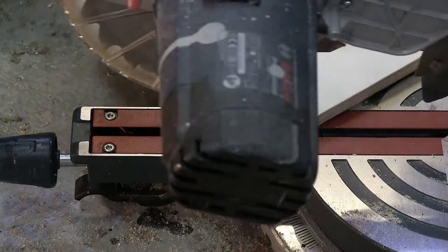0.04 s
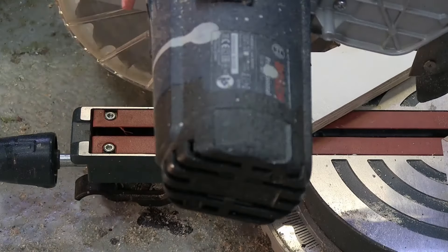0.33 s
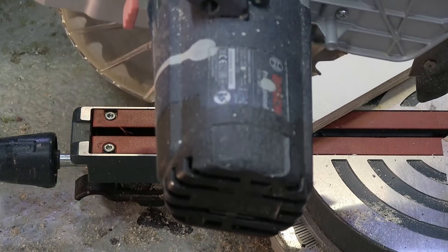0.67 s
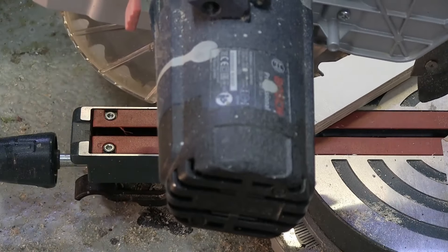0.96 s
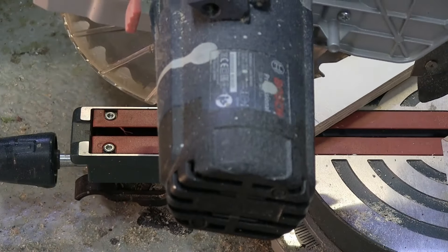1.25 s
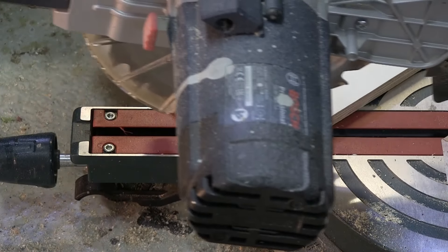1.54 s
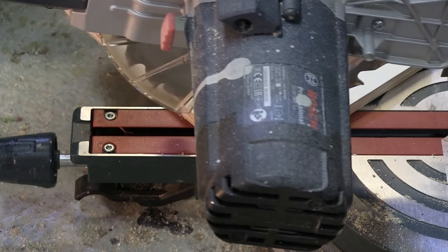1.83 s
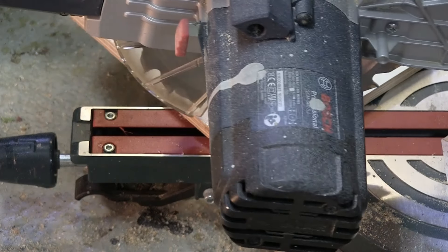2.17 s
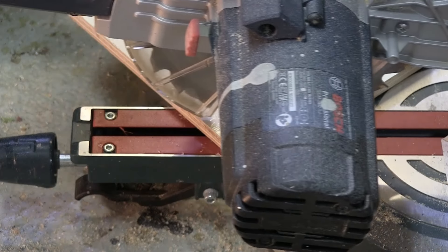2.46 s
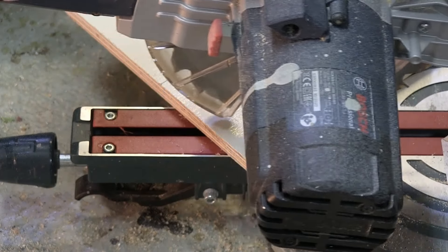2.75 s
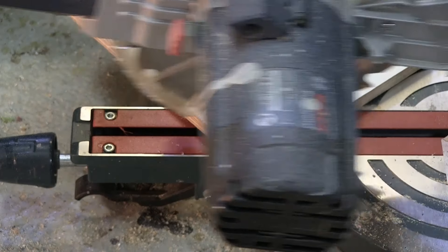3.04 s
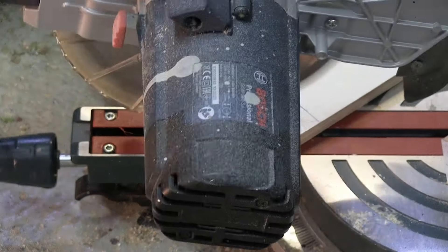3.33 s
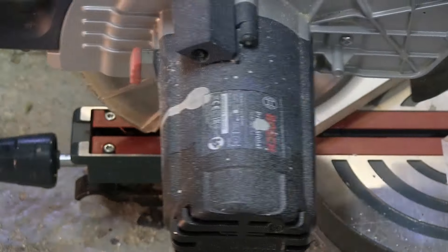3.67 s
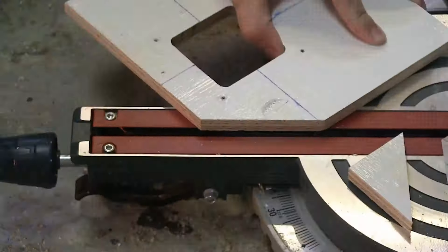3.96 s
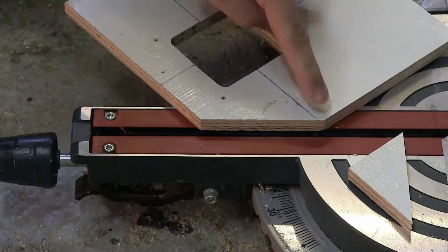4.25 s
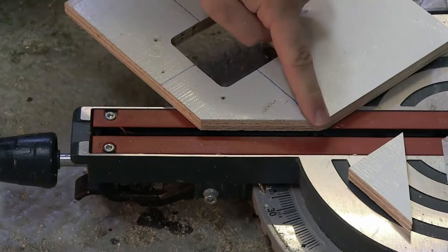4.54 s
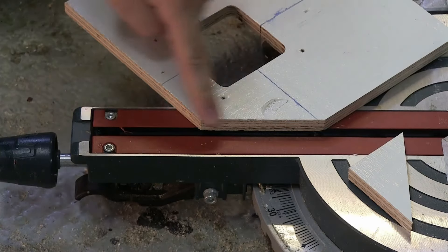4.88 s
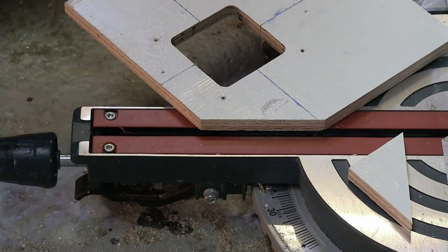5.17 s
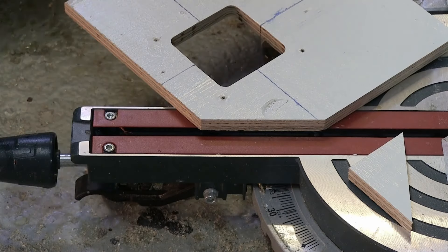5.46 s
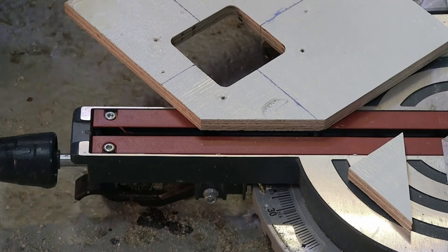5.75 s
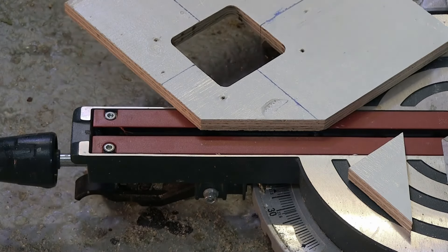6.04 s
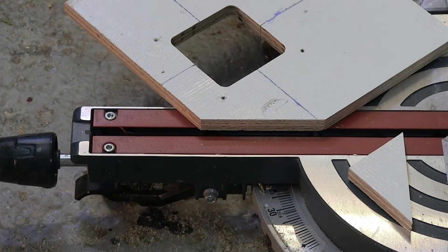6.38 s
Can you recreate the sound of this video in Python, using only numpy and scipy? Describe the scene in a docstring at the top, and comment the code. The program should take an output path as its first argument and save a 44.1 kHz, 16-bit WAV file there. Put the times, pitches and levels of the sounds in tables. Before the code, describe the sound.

A miter saw slides with light knocks, then roars through plywood and winds down with a falling whine and rattle.

```python
"""A quiet workshop, microphone close to a sliding miter saw, a fast limiter on the peaks.
The head is lined up: knocks ring its frame, the guard linkage clacks, and it rolls along its rails.
The motor jolts on with a roar of fan air and a gear whine; the blade screams and tears through plywood.
A brake pulls the whine down, then the blade coasts and rings while loose gears rattle in their
housing and the brushes sizzle on the commutator."""
import sys
import numpy as np
from scipy import signal
from scipy.fft import rfft, irfft, next_fast_len
from scipy.io import wavfile
from scipy.ndimage import uniform_filter1d, minimum_filter1d, map_coordinates

SR = 44100
rng = np.random.default_rng(int(sys.argv[2]) if len(sys.argv) > 2 else 0)


def file_out(sig):
    """Save sig as 16-bit WAV at sys.argv[1]."""
    # one column per channel
    cols = np.atleast_2d(sig).T
    # limit, then scale
    lim = np.clip(cols, -1, 1)
    pcm = np.round(lim * 32767).astype(np.int16)
    wavfile.write(sys.argv[1], SR, pcm)


N = 282548

# knocks of the saw head and the board (time [s], relative level [dB], click [dB], most excited [Hz])
HEAD_KNOCKS = [(0.019, -35, -24, 415), (0.184, -39, -15, 396), (0.856, -29.5, -21, 460),
               (0.876, -25.5, -24, 390), (0.891, -24.5, -15, 404), (0.907, -27.5, -19, 388),
               (0.927, -21.5, -17, 610), (0.939, -25.5, -24, 630), (1.13, -33, -17, 425)]
# spectrum of a hard contact (frequency [Hz], relative level [dB])
CONTACT_SPECTRUM = [(300, -33), (700, 8.5), (1500, 1), (3500, -2), (6000, -16), (15000, -42)]
# broad spectrum of the fan air and of the shaking that drives the blade (frequency [Hz], level [dB])
RUSH_SPECTRUM = [(150, -43), (400, -15.5), (900, -9), (1500, -5), (2100, -3), (3300, -1), (4800, -3),
                 (6400, -23), (9000, -46), (15000, -70)]
# spectrum of air and dust thrown off the blade (frequency [Hz], relative level [dB])
SPRAY_SPECTRUM = [(3240, -24), (5500, 1), (6500, -5), (6910, -3), (11400, -10.5), (15700, -14.5)]

TRIGGER, CUT_START, CUT_END = 3.298, 3.4, 3.85  # s; the brake grips as the cut ends
BRAKE_EASES, BRAKE_END = 4.16, 4.34  # s
TOP_SPEED = 366  # the rotor running free; all speeds are in turns per second
CRITICAL_SPEED, CRITICAL_OCTAVES = 34.7, 0.36  # gears, brushes and blade shake harder in this range


def amp(db):
    """Decibels to gain."""
    return 10 ** (np.asarray(db) / 20)


def unit(x):
    """Scale to rms 1."""
    return x / np.sqrt(np.mean(x ** 2) + 1e-20)


def clock():
    """The time of every sample in seconds."""
    return np.arange(N) / SR


def along(points, hz):
    """Read a curve of (Hz, value) points on a log frequency axis."""
    freqs, values = np.transpose(points)
    return np.interp(np.log(hz + 1), np.log(freqs + 1), values)


def wobble(rate):
    """A smooth random curve with rate knots a second."""
    return map_coordinates(rng.standard_normal(int(N * rate / SR) + 4), [clock() * rate])


def swell(start, end, rise, t60):
    """An envelope: a smooth rise from start, held until end, then dying away."""
    t = clock()
    attack = np.sin(np.pi / 2 * np.clip((t - start) / rise, 0, 1)) ** 2
    return attack * amp(-60 * np.maximum(t - end, 0) / t60)


def near(speed, best, octaves):
    """1 at the best speed, falling off to both sides."""
    return np.exp(-.5 * (np.log2(speed / best) / octaves) ** 2)


def powered(rise):
    """0 before the trigger is pulled, 1 from rise seconds after."""
    return np.clip((clock() - TRIGGER) / rise, 0, 1)


def filtered(x, response):
    """Filter x by a gain given as a function of frequency."""
    size = next_fast_len(N + SR // 2)
    return irfft(rfft(x, size) * response(np.fft.rfftfreq(size, 1 / SR)), size)[:N]


def coloured(x, spectrum):
    """x shaped by a spectrum, at rms 1."""
    return unit(filtered(x, lambda hz: amp(along(spectrum, hz))))


def noise(spectrum):
    """Noise of rms 1 with this spectrum."""
    return coloured(rng.standard_normal(N), spectrum)


def tone(hz, blur_hz, flutter_db):
    """A machine tone of rms 1, unsteady in pitch and level."""
    phase = 2 * np.pi * np.cumsum(hz + blur_hz * wobble(150)) / SR
    return unit(np.sin(phase) * amp(flutter_db * wobble(70)))


def impacts(rate, scatter_db, jitter=0.3):
    """A train of rate blows a second, uneven in time and size, at steady power."""
    passed = np.cumsum(rate) / SR
    late, size = rng.standard_normal((int(passed[-1]), 2)).T
    at = np.searchsorted(passed, np.arange(len(size)) + jitter * late).clip(0, N - 1)
    polarity = np.sign(rng.standard_normal(len(size)))
    blows = polarity * amp(scatter_db * size.clip(-2.5, 2.5)) / np.sqrt(rate[at])
    return unit(np.bincount(at, blows, N))


def resonate(x, modes, swell_db):
    """x rings a set of resonances, each swelling and fading in its own time; rms 1."""
    out = np.zeros(N)
    for centre, width, db in modes:
        ring = filtered(x, lambda f: 1j * f * width / (centre ** 2 - f * f + 1j * f * width))
        out += amp(db + swell_db * wobble(7)) * ring
    return unit(out)


def room_tone():
    """The workshop's faint, steady background."""
    # background spectrum (frequency [Hz], relative level [dB])
    background = [(15, -48), (25, -12), (70, -2), (152, -12), (291, -13.5), (391, -9), (618, -14.5),
                  (831, -19), (1970, -19), (13700, -24), (15700, -29.5)]
    return amp(-59.5) * noise(background)


def slide():
    """Pushes roll the head on its rails; pushes and knocks set its arm shuddering at a low resonance."""
    # pushes of the hand (start [s], end [s], rolling [dB], shudder [dB])
    pushes = [(-0.15, 0.056, -52, -47), (0.503, 0.637, -56, -70), (1.36, 1.68, -56.5, -47),
              (1.852, 2.034, -60, -46), (2.206, 2.513, -77, -52), (2.475, 2.703, -53.5, -46.5),
              (2.854, 3.185, -37.5, -45.5)]
    # spectrum of the shaking arm (frequency [Hz], relative level [dB])
    arm_spectrum = [(15, -28), (25, -13), (49, 4), (64, 4.5), (79, 1), (129, -9.5), (140, -23), (180, -15),
                    (310, -120)]
    # spectrum of the rolling on the rails (frequency [Hz], relative level [dB])
    rail_spectrum = [(65, -12), (110, -17.5), (184, 2.5), (217, -15.5), (348, 0.5), (558, -13), (700, -6.5),
                     (953, -14), (3940, -17.5), (7300, -34.5), (15000, -42)]
    roll = [amp(db) * swell(start, end, rise=0.2, t60=0.38) for start, end, db, _ in pushes]
    shake = [amp(db) * swell(start, end, rise=0.2, t60=1.38) for start, end, _, db in pushes]
    shake += [amp(db - 33.5) * swell(s, s + 0.053, rise=0.053, t60=1.38) for s, db, _, _ in HEAD_KNOCKS]
    shudder = unit(noise(arm_spectrum) + amp(-2) * tone(68, blur_hz=6, flutter_db=-1))
    rolling = np.linalg.norm(roll, axis=0) * noise(rail_spectrum) * amp(1.44 * wobble(70))
    return (1 - powered(0.01)) * (rolling + np.linalg.norm(shake, axis=0) * shudder)


def knocks():
    """Each knock rings the hollow frame under a click; where it lands decides which modes answer."""
    # modes of the frame (frequency [Hz], relative level [dB], t60 [s])
    frame_modes = [(398, 8.5, 0.051), (430, -13, 0.096), (620, 4, 0.046), (795, -3, 0.021),
                   (1410, 15, 0.024), (2200, 8, 0.28), (4240, 27, 0.018)]
    out, t = np.zeros(N + SR), np.arange(SR // 4) / SR
    contact = noise(CONTACT_SPECTRUM)
    attack = 1 - np.exp(-t / 0.00083)
    for start, db, click_db, centre_hz in HEAD_KNOCKS:
        at = round(start * SR)
        ring = np.zeros(len(t))
        for hz, level, t60 in frame_modes:
            struck_db = level - 17 * abs(np.log2(hz / centre_hz))
            ring += amp(struck_db - 60 * t / t60) * np.sin(2 * np.pi * hz * t)
        click = amp(click_db - 1 - 60 * t / 0.1) * contact[at:at + len(t)]
        out[at:at + len(t)] += amp(db - 4) * (ring / np.abs(ring).max() + click) * attack
    return out[:N]


def guard_clacks():
    """The guard linkage snaps: a crack, then a thin metal ring, cut short if the parts stay in contact."""
    # snaps of the linkage (time [s], level [dB], most excited [Hz], share of the full ring time [0-1])
    snaps = [(0.433, -45, 3000, .5), (0.466, -38, 900, 0.93), (2.192, -43, 700, 0.12),
             (2.366, -49, 5000, 0.3), (3.314, -15, 905, 0.5)]
    # modes of the linkage (frequency [Hz], relative level [dB], full t60 [s])
    linkage_modes = [(715, 1, 0.06), (750, -13, .4), (1110, -9.5, .12), (1540, -11, 0.055),
                     (2224, -10, .42), (3000, -9, .04), (4100, 3, 0.054), (4460, -3, .1)]
    out, t = np.zeros(N + SR), np.arange(SR // 2) / SR
    contact = noise(CONTACT_SPECTRUM)
    for start, db, centre_hz, share in snaps:
        at = round(start * SR)
        ring = np.zeros(len(t))
        for hz, level, t60 in linkage_modes:
            struck_db = level - 6.5 * abs(np.log2(hz / centre_hz))
            ring += amp(struck_db - 60 * t / (t60 * share)) * np.sin(2 * np.pi * hz * t)
        crack = amp(-9.5 - 60 * t / 0.044) * contact[at:at + len(t)]
        out[at:at + len(t)] += amp(db) * (ring / np.abs(ring).max() + crack)
    return out[:N]


def jolt():
    """The starting torque slams the gears together and shakes the whole arm."""
    # spectrum of the slam (frequency [Hz], relative level [dB])
    slam_spectrum = [(120, -57), (200, -32), (324, -9.5), (462, -24), (555, -6.5), (636, -25), (908, -2.5),
                     (1020, -12), (2000, -14), (2600, -20), (4400, -120)]
    age = np.maximum(clock() - TRIGGER, 0)
    return amp(-25) * np.exp(-(age / 0.1) ** 2) * noise(slam_spectrum)


def cut_depth():
    """The blade is fed steadily through the board, from 0 to 1."""
    return np.clip((clock() - CUT_START) / (CUT_END - CUT_START), 0, 1)


def rotor_speed():
    """Turns per second: the motor runs up, sags in the cut, is braked hard and then coasts."""
    run_up_s, brake_s, coast_s = 0.048, 0.49, 4.5  # time constants
    sag, coast_speed = 31, 91  # turns per second: lost in the cut, left when the brake lets go
    brake_drag, bearing_drag = 110, 25.6  # turns per second lost each second
    t = clock()
    driven = TOP_SPEED * (1 - np.exp(-np.maximum(t - TRIGGER, 0) / run_up_s)) - sag * cut_depth() ** 3.5
    drag = brake_drag * brake_s
    braked = (TOP_SPEED - sag + drag) * np.exp(-(t - CUT_END) / brake_s) - drag
    friction = bearing_drag * coast_s
    coasting = (coast_speed + friction) * np.exp(-(t - BRAKE_END) / coast_s) - friction
    return np.maximum(np.where(t < CUT_END, driven, np.maximum(braked, coasting)), 1)


def gear_play(speed):
    """How hard the teeth rattle: kicked by the start, pressed by the brake, then loose while coasting."""
    starting = amp(-19) * swell(TRIGGER, TRIGGER + 0.059, rise=0.014, t60=0.36)
    braking = amp(-29.5) * swell(CUT_END, BRAKE_EASES, rise=0.075, t60=0.94)
    loose = amp(-33.5 + 2.5 * near(speed, CRITICAL_SPEED, CRITICAL_OCTAVES))
    loose *= swell(BRAKE_END - 0.06, N / SR, rise=0.076, t60=1)
    loose *= np.minimum(speed / 26, 1) ** 0.65  # dies away towards rest
    return starting + np.hypot(braking, loose)


def gear_rattle(speed, teeth, loose_teeth):
    """Tooth blows ring the gear housing over a broad clatter."""
    # resonances of the housing (frequency [Hz], width [Hz], relative level [dB])
    housing_modes = [(780, 45, 4.5), (1044, 70, 1.5), (1252, 50, 2.5), (1400, 20, -8), (2630, 110, 8),
                     (3186, 79, 5), (3720, 90, 1), (4776, 120, 2)]
    # spectrum of the loose teeth (frequency [Hz], relative level [dB])
    clatter_spectrum = [(240, -80), (400, -16.5), (746, -3.5), (871, -8.5), (1070, 1.5), (1700, -6),
                        (2620, -3.5), (4850, -8.5), (5030, -17), (5300, -14), (7000, -34), (9100, -60),
                        (15400, -120)]
    ring = amp(-5.5) * resonate(teeth, housing_modes, swell_db=4)
    clatter = amp(-1.5) * coloured(loose_teeth, clatter_spectrum)
    return gear_play(speed) * (ring + clatter)


def fan_roar(speed):
    """Air rushes through the motor fan, louder with speed."""
    return amp(-20.5) * (speed / TOP_SPEED) ** 1.26 * noise(RUSH_SPECTRUM) * amp(1.2 * wobble(200))


def brush_sizzle(speed, glide):
    """Carbon brushes scrape the commutator bars and ring the blade, chattering at the critical speed."""
    # thin, high modes of the blade (frequency [Hz], width [Hz], relative level [dB])
    high_modes = [(7740, 52, -3), (8740, 45, 1), (11130, 54, 0), (13600, 95, -23)]
    # spectrum of the brushes (frequency [Hz], relative level [dB])
    hiss_spectrum = [(3240, -10), (5050, 1), (5400, 3.5), (6670, -1.5), (7850, 1.5), (8760, 0.5),
                     (10200, -7.5), (11500, 0.5), (12500, -1), (15700, -26)]
    scrape = impacts(24 * speed, scatter_db=2) + rng.standard_normal(N) + .45 * glide
    ring = amp(-11) * resonate(scrape, high_modes, swell_db=5.5)
    hiss = amp(-1) * coloured(scrape, hiss_spectrum)
    level = amp(-39.5) * np.minimum(speed / 133, 1) ** 0.98
    chatter = amp(5 * near(speed, CRITICAL_SPEED, CRITICAL_OCTAVES))
    return level * chatter * (hiss + ring) * amp(2.2 * wobble(21.84))


def blade_air(speed):
    """The spinning blade throws off a hiss of air."""
    return amp(-30) * (speed / TOP_SPEED) ** 1.94 * noise(SPRAY_SPECTRUM)


def drone(speed):
    """The motor drones at speed; the gears grumble when slow."""
    # spectrum of both (frequency [Hz], relative level [dB])
    drone_spectrum = [(30, -11), (60, -10.5), (130, -2), (260, -3.5), (400, -1.5), (520, 7.5), (800, -20),
                      (1500, -65)]
    motor = amp(-44) * (speed / TOP_SPEED) ** 1.48
    grumble = amp(-48) * near(speed, 19.3, octaves=0.82)
    return (motor + grumble) * noise(drone_spectrum)


def running_noise(speed):
    """At speed, rushing air roars; when slow, single gear teeth rattle the housing."""
    glide = tooth_errors(speed)
    teeth = impacts(18 * speed, scatter_db=3) + .15 * glide
    loose_teeth = impacts(18 * speed, scatter_db=2.5) + .6 * rng.standard_normal(N) + .3 * glide
    # the backlash opens and closes once per turn of the geared-down blade
    blade_turns = np.cumsum(speed / 4.8) / SR
    backlash = amp(0.35 * np.sin(2 * np.pi * blade_turns) + 0.95 * wobble(60))
    rattle = gear_rattle(speed, teeth, loose_teeth)
    roar = fan_roar(speed)
    sizzle = brush_sizzle(speed, glide)
    air = blade_air(speed)
    return roar + air + backlash * (rattle + sizzle + blade_jangle(speed, teeth)) + drone(speed)


def bench_rumble(speed):
    """The running motor shakes the bench."""
    # spectrum of the bench (frequency [Hz], relative level [dB])
    bench_spectrum = [(25, -4), (60, -1), (130, -19), (300, -25), (1000, -70)]
    return powered(0.019) * amp(-60.5) * speed / TOP_SPEED * noise(bench_spectrum)


def gear_whine(speed):
    """The nine-tooth pinion sings at its mesh rate, swelling through the resonances of its case."""
    # how well the gear case radiates a tone (frequency [Hz], gain [dB])
    case_response = [(400, -18), (560, -7), (640, -16.5), (735, -3), (790, -2), (880, -18), (970, -4.5),
                     (1040, 8.5), (1120, 1), (1220, 0.5), (1300, -3), (1400, -3.5), (1620, -13),
                     (2700, -12), (3300, -12.5), (5000, -12), (6600, -20)]
    # how blade and guard colour the high tones (frequency [Hz], gain [dB])
    blade_response = [(1500, -0.5), (2300, -3), (2620, 2), (2900, -2), (3250, 0), (3500, -7), (3760, 5),
                      (4020, -1), (4250, -1), (4450, 0), (4850, 4), (5080, -6), (5300, 6), (5800, -2),
                      (7000, -5), (7780, 7), (8100, 1), (8650, 5), (9300, -3), (10400, -11), (11250, 4),
                      (12300, -6), (14000, -8)]
    # weaker rotor tones (order [per turn], relative level [dB], strongest at [turns/s], width [octaves])
    rotor_tones = [(9.035, -26, 137, 0.14), (8.95, -33, 300, 0.13), (16.65, -40, 33.7, 0.17),
                   (17.84, -32.5, 141, 0.18), (24.4, -34, 204, .22), (33, -43, 79.6, 0.16),
                   (46.7, -39, 82, 0.15), (62.8, -38, 67, .3), (85, -41.5, 31, .1), (97.2, -42, 54, .05)]
    mesh_hz, slack_s = 9 * speed, 0.049
    out = np.zeros(N)
    for multiple in (1, 2):
        sideband = multiple * amp(-13.5)  # from eccentricity
        for offset, size in ((-1, sideband), (0, 0.87), (0.98, sideband)):
            hz = multiple * mesh_hz + offset * speed
            level = size * amp(-31 + along(case_response, hz))
            out += level * tone(hz, blur_hz=8 + speed / 6, flutter_db=4)
    out *= (speed / 100) ** 0.89
    out *= np.minimum(speed / 59, 1) ** 1.5  # when slow, the teeth lose contact
    out *= amp(-7 * np.exp(-((clock() - BRAKE_END + slack_s) / slack_s) ** 2))  # dips as the braking ends
    for order, db, best, octaves in rotor_tones:
        hz = order * speed
        rough = tone(hz, blur_hz=12 + .008 * hz, flutter_db=3) * amp(1.5 * wobble(11))
        out += amp(db - 1.5 + along(blade_response, hz)) * near(speed, best, octaves) * rough
    for multiple in range(9, 19):  # high harmonics of the mesh
        hz = np.minimum(multiple * mesh_hz, SR / 2)
        level = amp(-52 + along(blade_response, hz)) * near(speed, 96, octaves=0.19)
        out += level * tone(hz, blur_hz=55, flutter_db=5.5)
    return out


def load_whine(speed):
    """Under load the motor whines hard and rough, rising as it runs up."""
    order, sideband = 9.25, amp(-13)
    lines = np.zeros(N)
    for offset, size in ((-1, sideband), (0, 1), (1, sideband)):
        waver = amp(1.3 * wobble(25.06))
        lines += size * waver * tone((order + offset) * speed, blur_hz=60.04, flutter_db=4.5)
    return amp(-25) * swell(3.36, 3.66, rise=.03, t60=.9) * lines


def plywood_cut():
    """The blade screams in the plywood, tearing harder with depth and throwing dust until it is free."""
    # blade tones in the cut (frequency [Hz], blur [Hz], level [dB], best depth [0-1], spread [depth])
    scream_tones = [(2110, 60, -9.5, 0.62, 0.28), (2870, 44.8, -5, 0.88, 0.15), (3230, 60, -9, .35, 0.25),
                    (3390, 64, -6, 0.54, 0.23), (3560, 49.9, -6, .35, .22), (4120, 31.5, -7, 0.16, 0.11),
                    (4290, 35, -4, 0.44, 0.14), (6470, 66, -6.5, 0.45, 0.16)]
    # spectrum of tearing wood (frequency [Hz], relative level [dB])
    tear_spectrum = [(1500, -16.5), (3500, -2.5), (5100, -1), (6300, -9.0), (9000, -12.5), (15000, -29)]
    depth = cut_depth()
    tear = amp(-18.5) * depth ** 1.8 * noise(tear_spectrum)
    scream = np.zeros(N)
    for hz, blur_hz, db, best, spread in scream_tones:
        excited = np.exp(-.5 * ((depth - best) / spread) ** 2)
        scream += amp(db) * excited * tone(hz, blur_hz, flutter_db=4.5)
    scream *= amp(-23.5) * swell(CUT_START, CUT_END, rise=0.04, t60=0.063)
    dust = amp(-25.5) * noise(SPRAY_SPECTRUM)
    return scream + swell(CUT_START, CUT_END + 0.018, rise=0.27, t60=0.063) * (tear + dust)


def brake_groan():
    """The braking torque makes the motor housing groan."""
    braking = swell(CUT_END, BRAKE_EASES, rise=0.089, t60=0.22)
    return amp(-39) * braking * tone(570, blur_hz=140, flutter_db=3.5)


def tooth_errors(speed, count=190, size=8192):
    """Uneven teeth repeat every turn: many faint rotor overtones, gliding down together as it coasts."""
    strength, angle = rng.standard_normal((count, 2)).T
    orders = amp(7 * strength.clip(-2, 1.6)) * np.exp(2j * np.pi * angle)
    orders[:42] = 0  # only the sharp edges of the teeth radiate
    one_turn = irfft(orders, size)
    turns = np.cumsum(speed * (1 + .004 * wobble(150))) / SR
    return unit(near(speed, 78, octaves=.5) * np.interp(turns % 1 * size, np.arange(size), one_turn))


def blade_rings(speed):
    """The coasting blade rings; its modes swell one after another as the speed falls."""
    # free blade modes (frequency [Hz], blur [Hz], level [dB], strongest at [turns/s], width [octaves])
    plate_modes = [(738, 15, -43.5, 51, 1.13), (1052, 22, -42, 34, 1.1), (1130, 40, -40, 43.5, 0.12),
                   (2700, 90, -39.5, 31.5, .13), (3730, 95, -37.5, 38.5, .17), (4790, 130, -43.5, 49, .5)]
    out = np.zeros(N)
    for hz, blur_hz, db, best, octaves in plate_modes:
        ring = resonate(tone(hz, blur_hz, flutter_db=4), [(hz, 3 * blur_hz, 0)], swell_db=2)
        out += amp(db) * near(speed, best, octaves) * ring
    return out


def dropouts(half_length_s=0.016):
    """A gain: three brief dropouts in the rattle and hiss, while the whine carries on."""
    # the dropouts (time [s], gain [dB])
    drops = [(4.19, -6), (4.885, -8), (5.15, -9)]
    return amp(sum(db * np.exp(-((clock() - s) / half_length_s) ** 2) for s, db in drops))


def blade_jangle(speed, teeth):
    """Near the critical speed the tooth blows shake the blade into a jangle."""
    # broad modes of the shaken blade (frequency [Hz], width [Hz], relative level [dB])
    shaken_modes = [(1170, 210, -1.5), (2230, 220, -10), (2660, 240, 2.5), (3150, 280, -1),
                    (3700, 320, -0.5), (4600, 480, -7)]
    ring = resonate(coloured(teeth, RUSH_SPECTRUM), shaken_modes, swell_db=2.2)
    return amp(-35) * near(speed, CRITICAL_SPEED, CRITICAL_OCTAVES) * ring


def room(x, wet_db):
    """Workshop echoes behind the direct sound; the treble dies first."""
    # reverberation of the workshop (frequency [Hz], t60 [s])
    decay_times = [(200, 0.24), (2000, 0.14), (12000, 0.067)]
    hz, t, bins = signal.stft(rng.standard_normal(SR // 2), SR, nperseg=256)
    tail = signal.istft(bins * amp(-60 * t / along(decay_times, hz)[:, None]), SR, nperseg=256)[1]
    wet = signal.fftconvolve(x, tail / np.linalg.norm(tail))[:N]
    return (x + amp(wet_db) * wet) / np.sqrt(1 + amp(wet_db) ** 2)


def scene():
    """The saw from close by, in mono; the workshop's echoes make the gliding whine come and go."""
    speed = rotor_speed()
    spinning = dropouts() * (running_noise(speed) + blade_rings(speed))
    saw = powered(0.0071) * (spinning + load_whine(speed) + brake_groan() + jolt() + plywood_cut())
    whine = room(powered(0.031) * gear_whine(speed), wet_db=0.5)
    bench = bench_rumble(speed)
    sawing = room(saw, wet_db=-10) + whine + bench
    lining_up = room(knocks(), wet_db=-5) + room(guard_clacks(), wet_db=-7.5) + slide()
    return (lining_up + sawing + room_tone())[None]


def record(dry):
    """The close microphone feeds a fast limiter that holds the peaks, then a steep treble cut."""
    ceiling, top_hz = 0.35, 15800
    needed = np.minimum(1, ceiling / (np.abs(dry[0]) + 1e-9))
    gain = uniform_filter1d(minimum_filter1d(needed, size=60), size=60)
    return filtered(dry[0] * gain, lambda hz: hz < top_hz)[None]


dry = scene()
out = record(dry)
file_out(out)
```